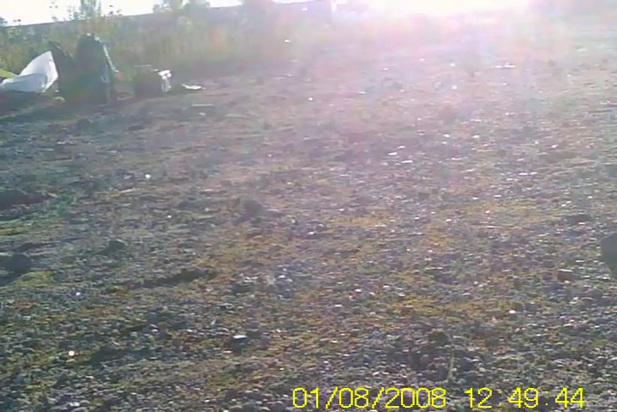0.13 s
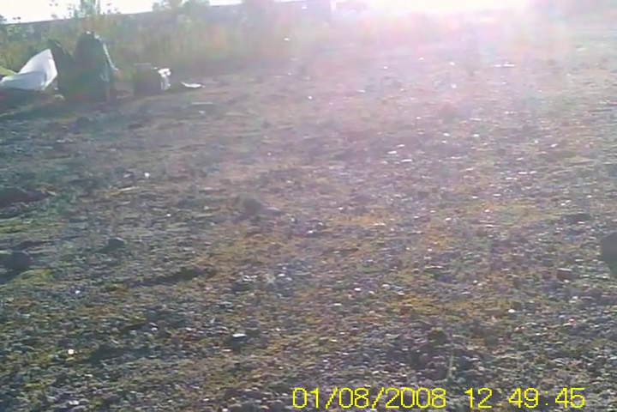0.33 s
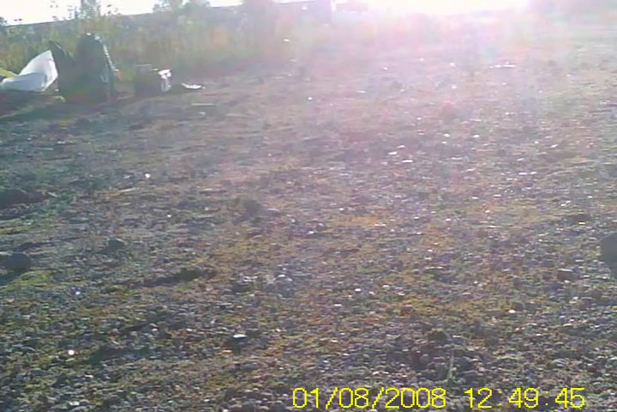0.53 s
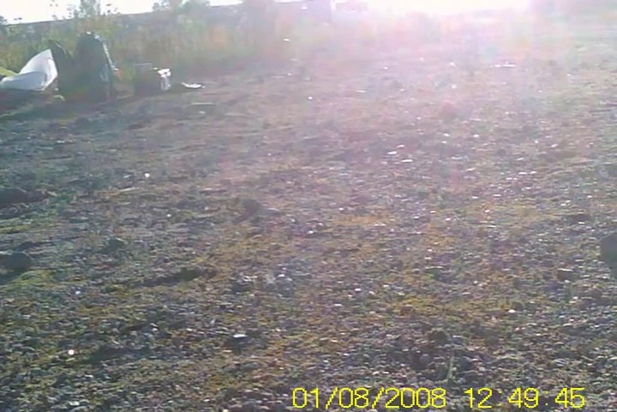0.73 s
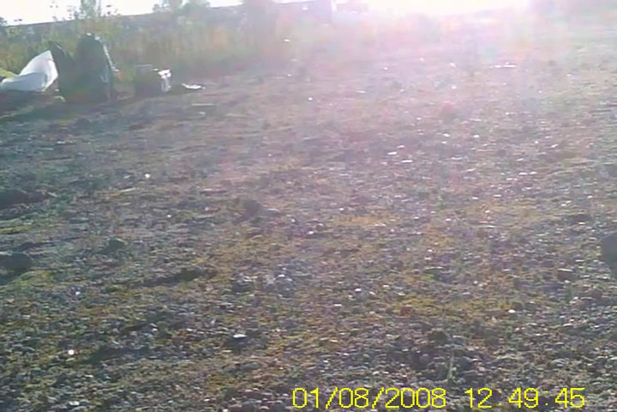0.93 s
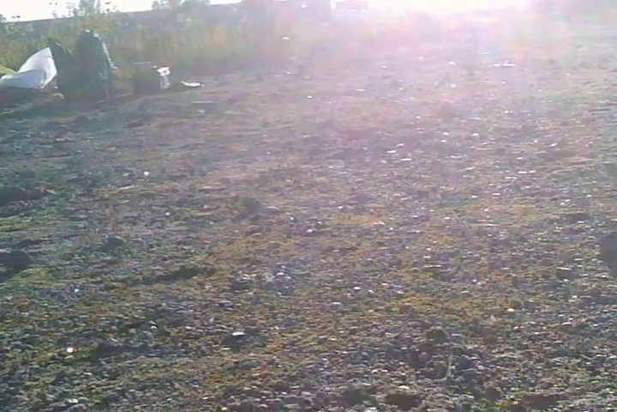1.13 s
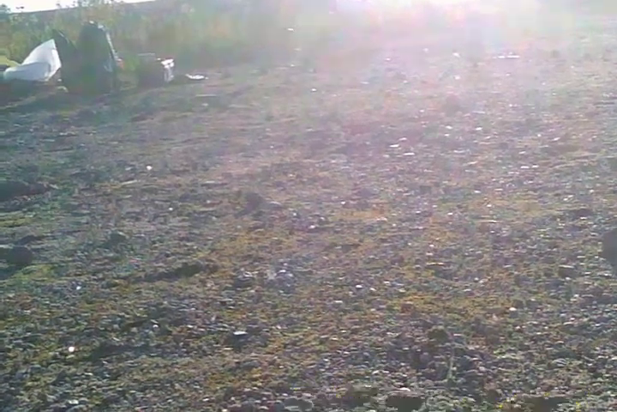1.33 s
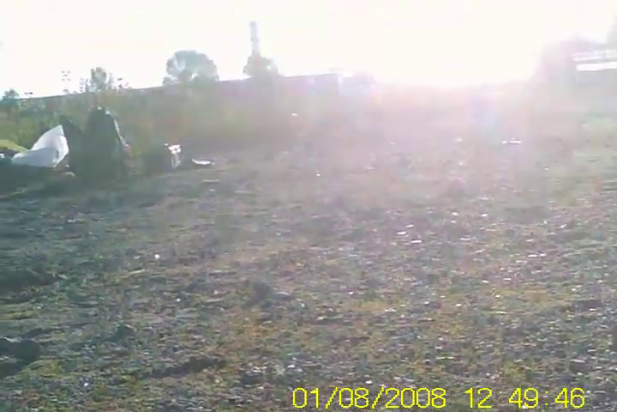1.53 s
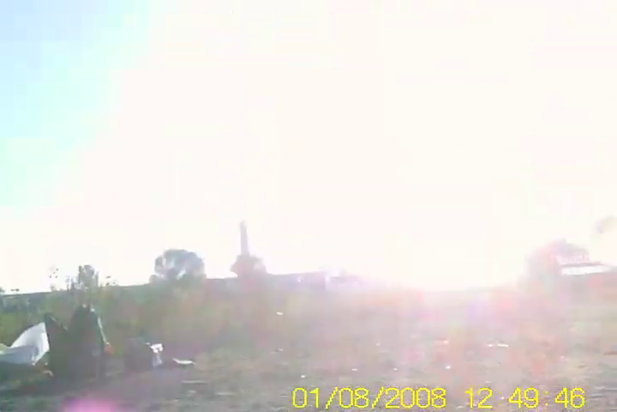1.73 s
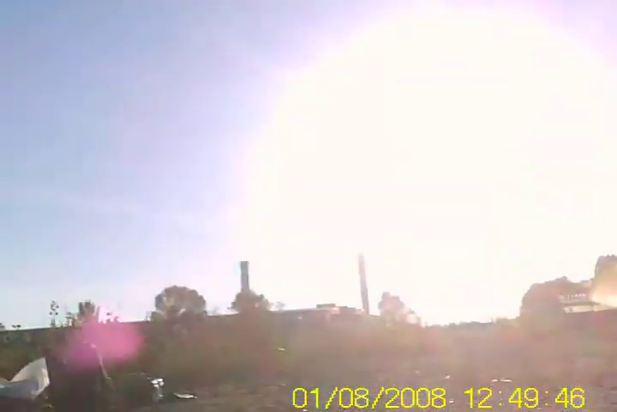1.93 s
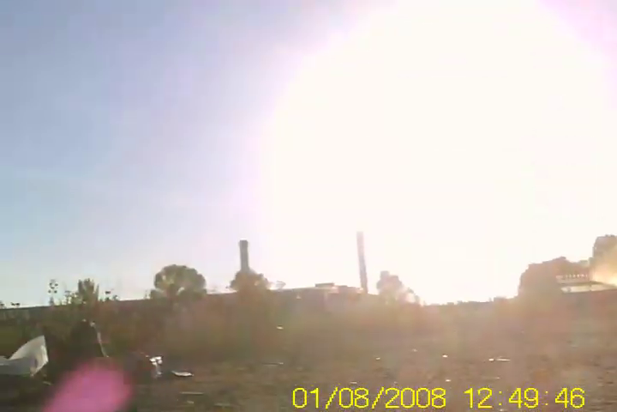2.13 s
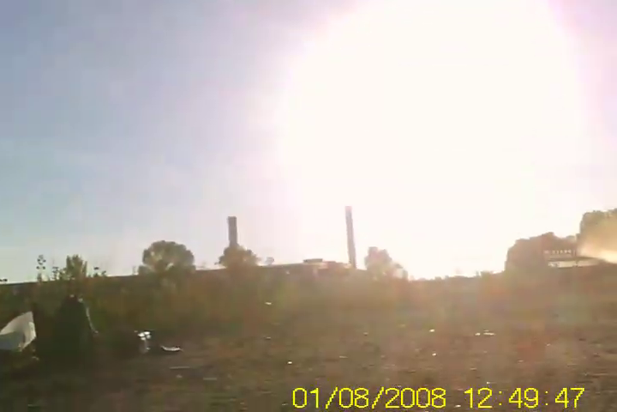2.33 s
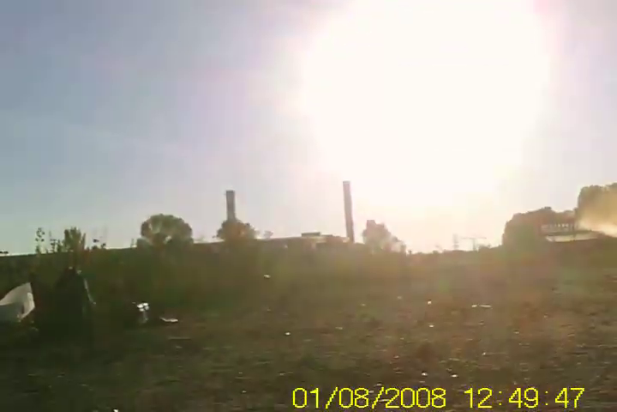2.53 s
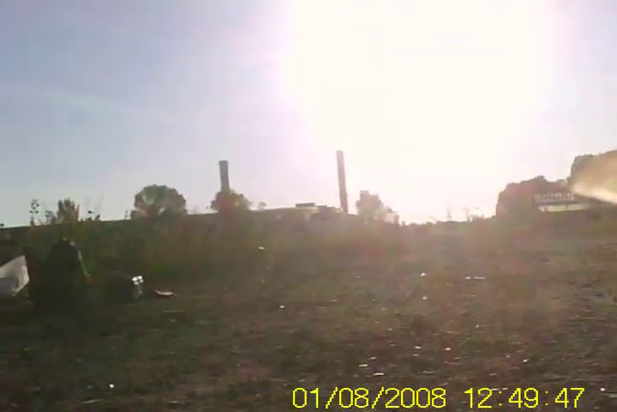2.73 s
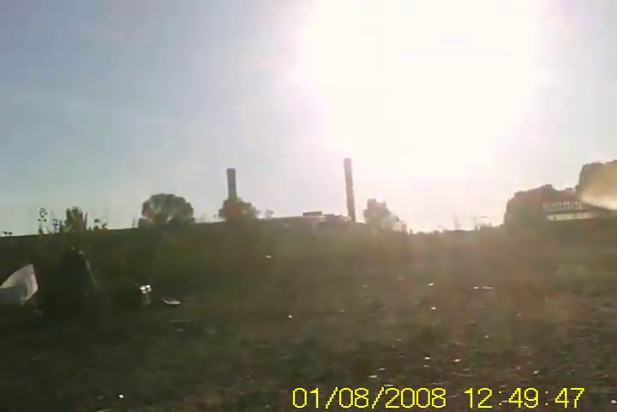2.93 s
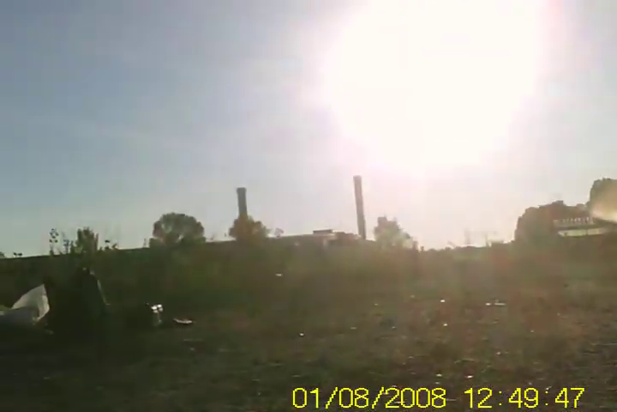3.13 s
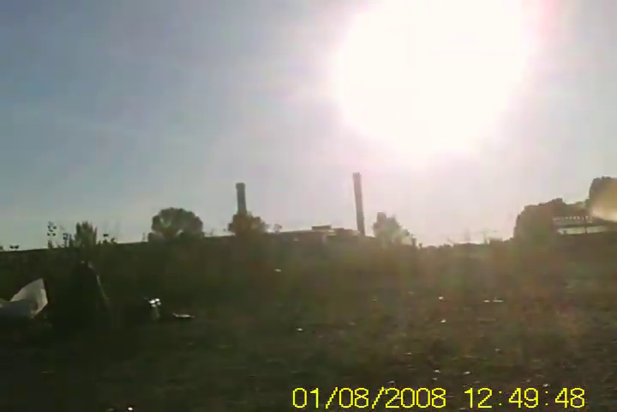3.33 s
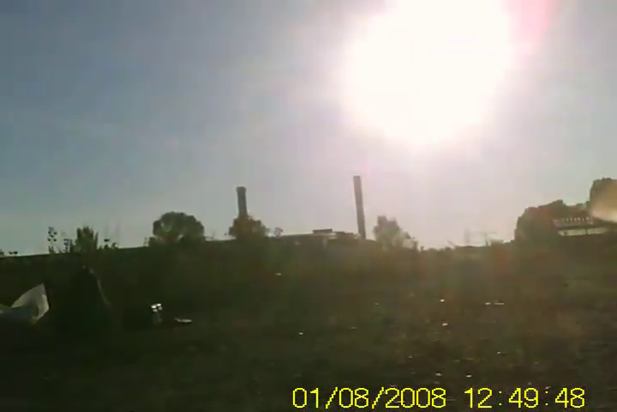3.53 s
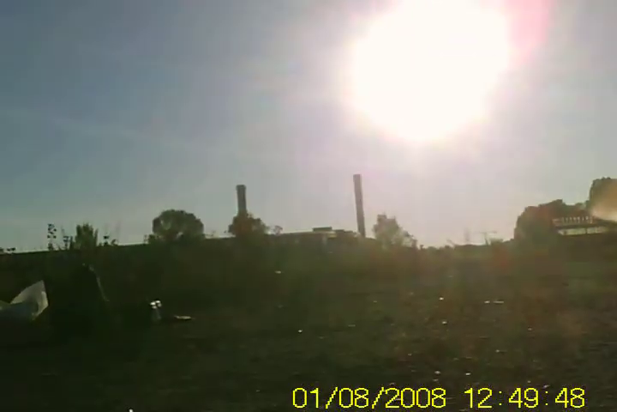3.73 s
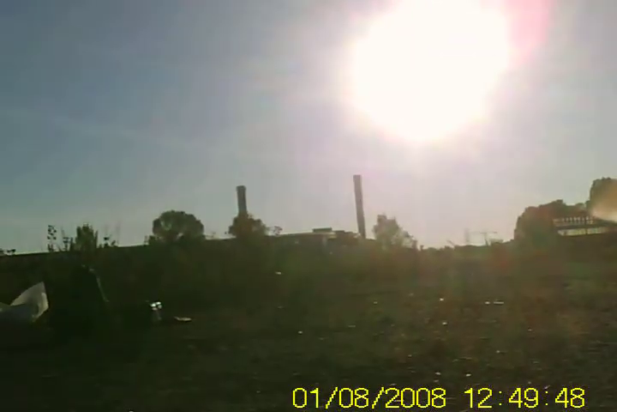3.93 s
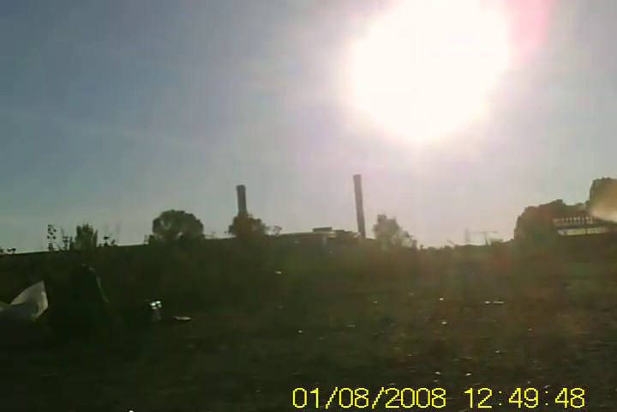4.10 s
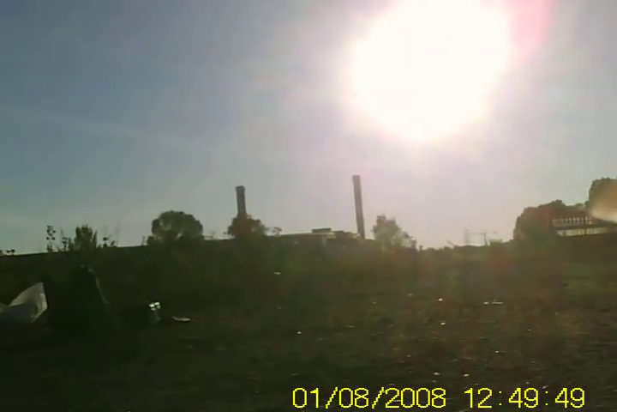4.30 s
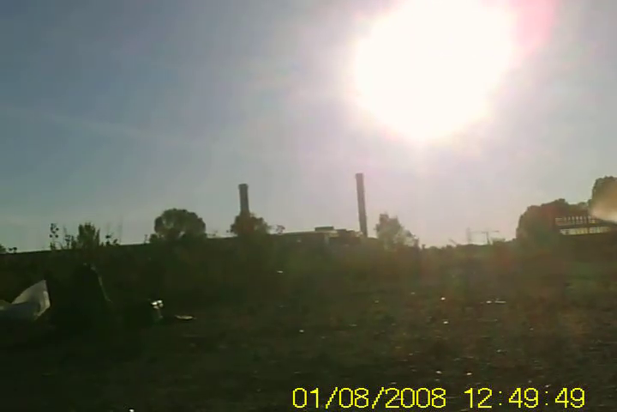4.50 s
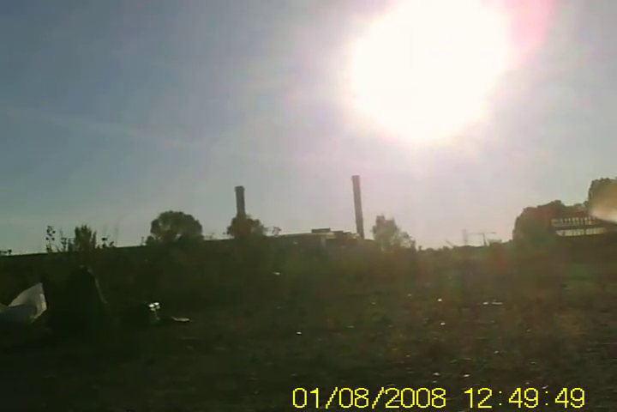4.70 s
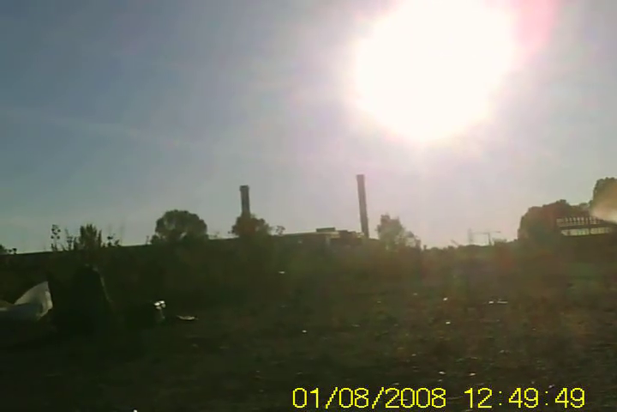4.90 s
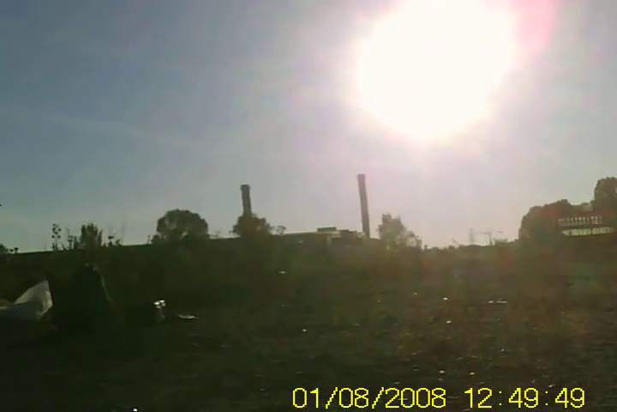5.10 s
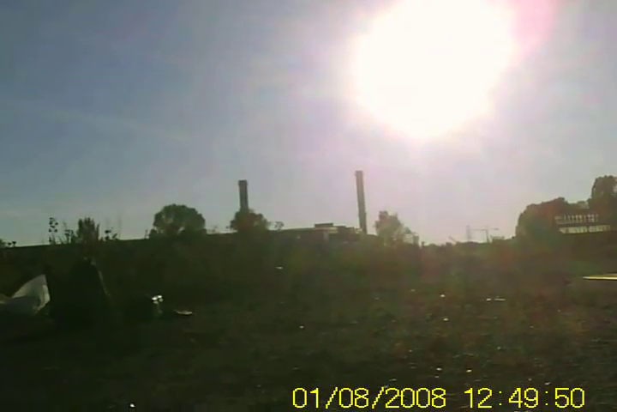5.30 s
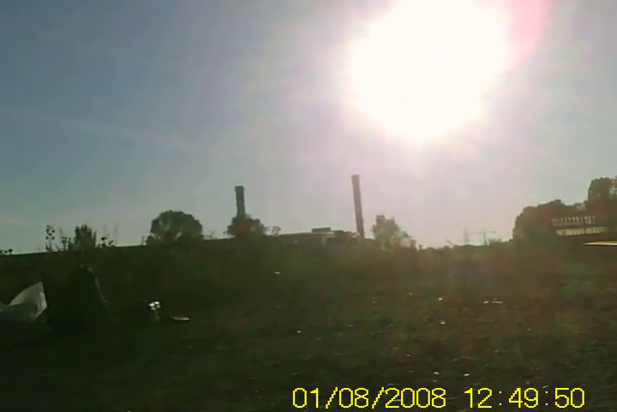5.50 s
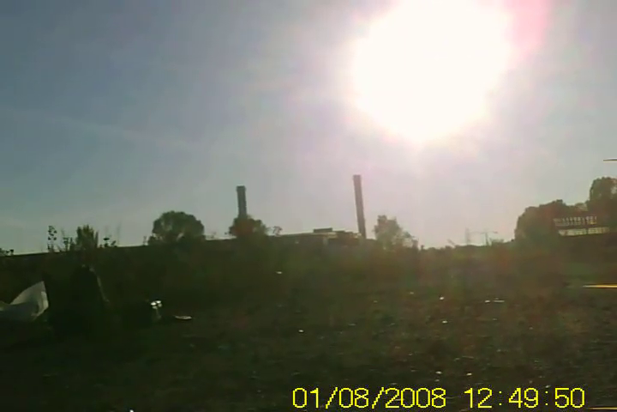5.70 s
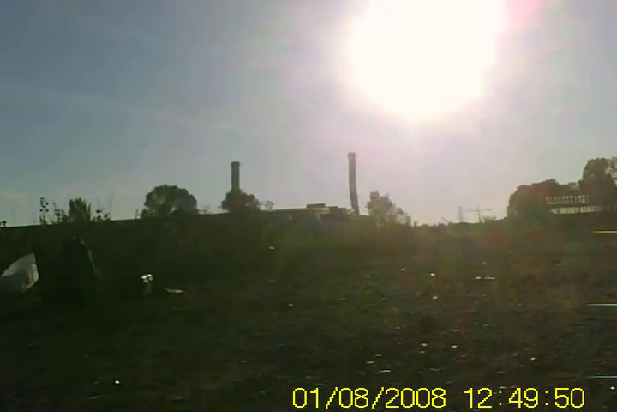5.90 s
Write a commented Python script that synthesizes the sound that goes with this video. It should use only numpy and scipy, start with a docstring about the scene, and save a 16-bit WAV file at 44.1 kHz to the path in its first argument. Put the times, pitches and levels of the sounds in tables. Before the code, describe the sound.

Hands tap and brush a model plane outdoors amid steady buzzy ticks; after five seconds its electric motor jerks alive and revs loudly.

```python
"""The brushless motor of a model plane stutters into life after five seconds and whines up: sine lines locked
to the shaft, a switching whistle and a rattling mount; propeller wash buffets and overloads the microphone.
Before that, hands knock, creak, brush and squeak on the airframe: contact pulses through resonances, and
shaped noise. Radio packets tick in the microphone line over airy noise, and a far engine drones as a
wavering, climbing sine."""
import sys
import numpy as np
from scipy import signal
from scipy.fft import rfft, irfft
from scipy.io import wavfile
from scipy.ndimage import uniform_filter1d

SR = 44100
rng = np.random.default_rng(int(sys.argv[2]) if len(sys.argv) > 2 else 0)


def int16_out(signal):
    """Quantize to a 16-bit WAV file."""
    q = np.round(np.clip(np.atleast_2d(signal).T, -1, 1) * 32767)
    wavfile.write(sys.argv[1], SR, q.astype(np.int16))


N = 262395
TIME = np.arange(N) / SR


def amp(db):
    """Decibels to gain."""
    return 10 ** (np.asarray(db) / 20)


def unit(x):
    """Scale to rms 1."""
    return x / np.sqrt(np.mean(x ** 2) + 1e-20)


def curves(rows):
    """Each column of a table, joined by straight lines in time."""
    s, *columns = np.transpose(rows)
    return [np.interp(TIME, s, column) for column in columns]


def gain_at(points, hz):
    """Gain of a spectrum at the given frequencies, drawn in dB over log frequency."""
    f, db = np.transpose(points)
    return amp(np.interp(np.log(np.maximum(hz, 1)), np.log(f), db))


def noise(points):
    """White noise shaped to the given spectrum, rms 1."""
    size = 2 ** 19
    spectrum = rfft(rng.standard_normal(size))
    shaped = irfft(spectrum * gain_at(points, np.fft.rfftfreq(size, 1 / SR)))
    return unit(shaped[:N])


def drift(rate):
    """Random wander of rms 1 with a new target rate times a second."""
    knots = rng.standard_normal(8192)
    return unit(np.interp(TIME * rate, np.arange(len(knots)), knots))


def swell(s, rise_s, fall_s):
    """Exponential rise to 1 at time s, then an exponential fall."""
    return np.exp(-np.minimum(np.maximum((s - TIME) / rise_s, (TIME - s) / fall_s), 20))


def tone(phase):
    """A sine of rms 1 with a random starting phase."""
    return np.sqrt(2) * np.sin(phase + rng.uniform(0, 2 * np.pi))


def grains(per_s, spread_db, size=N):
    """Random contacts of either sign and uneven strength."""
    hits = rng.random(size) < per_s / SR
    signs = rng.choice([-1, 1], size)
    return hits * signs * amp(spread_db * np.minimum(rng.exponential(1, size), 3))


def resonate(x, hz, width):
    """One resonance with gain 1 at its peak; a narrower width rings longer."""
    r = np.exp(-np.pi * width / SR)
    zeros = np.array([1, 0, -1]) * (1 - r * r) / 2
    poles = [1, -2 * r * np.cos(2 * np.pi * hz / SR), r * r]
    return signal.lfilter(zeros, poles, x + 1e-18)


def body(x, modes):
    """Resonances side by side, signs alternating."""
    return sum((-1) ** k * amp(db) * resonate(x, hz, width) for k, (hz, width, db) in enumerate(modes))


def lowpass(x, hz, order=2):
    """Butterworth low-pass."""
    return signal.sosfilt(signal.butter(order, min(hz, .45 * SR), fs=SR, output="sos"), x)


def add(out, s, sound):
    """Mix a sound in at time s."""
    i = int(s * SR)
    out[i:i + len(sound)] += sound[:N - i]


# spectrum of open air and microphone hiss: [f/Hz, relative level per Hz/dB]
AIR_SPECTRUM = [(12, -3.5), (28, -1), (60, -1), (100, -7.5), (150, -14), (300, -21.5), (600, -28.5),
                (1200, -27.5), (2400, -35.5), (4500, -43.5), (6300, -42), (7500, -44.5), (10000, -46.5),
                (12500, -68)]
# the far engine comes and goes: [t/s, level/dB]
ENGINE_LEVEL = [(0, -39), (.95, -50), (1.13, -37), (1.4, -51), (2.4, -39.5), (2.8, -51), (3.5, -40),
                (4, -45), (4.2, -80)]
# the engine's starting pitch [Hz] and its steady climb [Hz per s]
ENGINE_HZ, ENGINE_CLIMB_HZ_PER_S = 65.8, 10.3


def outdoors(air_db=-38.5, waver_db=1.4):
    """Rumble and hiss as shaped noise; the far engine's drone is one wavering sine that climbs steadily."""
    engine_hz = ENGINE_HZ + ENGINE_CLIMB_HZ_PER_S * TIME
    air = amp(air_db) * noise(AIR_SPECTRUM)
    engine_gain = amp(curves(ENGINE_LEVEL)[0] + waver_db * drift(9))
    return air + engine_gain * tone(2 * np.pi * np.cumsum(engine_hz) / SR)


def shell(x, hz, width_hz=480, mount_db=-7, thud_db=-11, thud_hz=330, soft_hz=2300):
    """A soft touch rings the spot touched, the main mode of the airframe and its hollow hull."""
    spot = resonate(x, hz, width_hz)
    main_mode = amp(mount_db) * resonate(x, 1790, 200)
    hull_thud = amp(thud_db) * resonate(x, thud_hz, 520)
    return lowpass(spot + main_mode + hull_thud, soft_hz, order=3)


# fingers knock on the airframe: [t/s, peak level/dB, ring f/Hz]
FINGER_KNOCKS = [(.587, -19.5, 600), (.616, -14.5, 1950), (.662, -19.5, 1850), (.775, -23.5, 1580),
                 (.888, -25, 776), (.9066, -14.5, 744), (1.352, -25, 490), (1.871, -23, 930),
                 (2.119, -21.5, 1137), (2.711, -24, 553), (2.916, -27.5, 948), (3.028, -29, 320),
                 (3.189, -25.5, 1873), (3.632, -17.5, 1145), (3.697, -20, 700), (3.7035, -14.5, 950),
                 (3.812, -23, 1710), (4.152, -24, 1780), (4.168, -20.5, 1740), (4.232, -26, 1100),
                 (4.538, -21, 1730), (4.748, -23.5, 450), (4.879, -26, 1650)]
# the grip shifts and creaks: [start t/s, length/s, rms level/dB, centre f/Hz]
GRIP_CREAKS = [(.575, .125, -37.5, 1710), (.705, .18, -44.5, 1300), (.872, .098, -39.5, 850),
               (.99, .08, -43, 1070), (3.463, .076, -45, 590), (3.628, .11, -34, 720),
               (3.786, .09, -38.5, 1671), (4.089, .052, -44.5, 688), (4.14, .053, -36.5, 1690),
               (4.52, .04, -42, 700), (4.727, .1, -41.5, 1330)]


def handling(stray_db=-61, settling_db=-56, settling_s=.45):
    """Knocks are single contacts, creaks are runs of tiny slips; both ring the shell over faint stray ticks."""
    out, tap = np.zeros(N), signal.unit_impulse(2048)
    for s, db, hz in FINGER_KNOCKS:
        scrape = .035 * rng.standard_normal(len(tap)) * np.exp(-TIME[:len(tap)] / .006)
        knock = shell(tap + scrape, hz, width_hz=300, thud_db=-20.5)
        add(out, s, amp(db) * knock / np.abs(knock).max())
    for s, length, db, hz in GRIP_CREAKS:
        size = int(length * SR)
        slips = grains(600, 4.5, size=size) * signal.windows.tukey(size, .4)
        creak = unit(shell(slips, hz, width_hz=670, mount_db=-34, thud_db=-3))
        add(out, s, amp(db) * creak)
    # the grip is never quite still: stray ticks all along, louder around the time it settles
    restless = amp(stray_db) + amp(settling_db) * swell(settling_s, 1, .5)
    return out + restless * unit(shell(grains(60, 1.9), 1200, width_hz=1500, mount_db=-3, thud_db=1.5))


# ringing of each packet tick: [f/Hz, width/Hz, level/dB]
TICK_MODES = [(591, 57, 4), (1443, 125, 3.5), (2155, 150, 1), (2368, 91, 4.5), (2940, 230, 2),
              (3420, 185, -2), (3850, 400, -4.5)]
# radio link: packets per s, first packet [s], and a pause in the stream [s]
PACKET_RATE, FIRST_PACKET_S = 50.635, .0052
PAUSE_START_S, PAUSE_END_S = 4.2, 4.26


def radio_ticks(level_db=-31.0, lead_share=0.22, lead_s=0.00171, data_db=-24, busy_db=-7):
    """Packets leak into the line as a weak edge, then a strong one; after the pause, as a data burst and edge."""
    edges = np.zeros(N)
    for s in np.arange(FIRST_PACKET_S, TIME[-1], 1 / PACKET_RATE):
        if s < PAUSE_START_S:
            add(edges, s - lead_s, [-lead_share])
            add(edges, s, [1])
        elif s > PAUSE_END_S:
            add(edges, s - lead_s, amp(data_db) * rng.standard_normal(size=130))
            add(edges, s + rng.normal(0, .0003), [amp(busy_db)])  # timing jitters
    ticks = lowpass(body(edges, TICK_MODES), 4000, order=8)
    return amp(level_db) * ticks / np.abs(ticks[:SR]).max()  # level_db sets the peak of the first second


# swishes: brushing over the camera case; the rows at 4.313 and 4.358 are the hiss of the two squeaks:
# [peak t/s, swell/s, level/dB]
SWISHES = [(.66, .09, -59), (1.21, .035, -48), (1.285, .007, -34), (1.32, .045, -39.5), (1.415, .025, -49),
           (1.356, .007, -25), (1.378, .009, -21), (1.61, .05, -56.5), (1.766, .016, -44), (2.99, .02, -52),
           (3.021, .009, -41), (3.69, .07, -57.5), (3.82, .025, -55), (4.161, .012, -47),
           (4.313, .012, -40.5), (4.358, .016, -43), (4.79, .06, -52.5)]
# grit snaps against the case: [t/s, level/dB]
GRIT_SNAPS = [(.997, -44), (1.049, -39), (1.278, -27.5), (1.439, -44), (3.0275, -25), (3.0298, -20.5)]
# spectrum of swishes and snaps: [f/Hz, relative level per Hz/dB]
SWISH_SPECTRUM = [(200, -2.5), (400, -10.5), (900, -25), (1450, -11), (2100, -10.5), (2600, -20.5),
                  (3400, -2), (4400, -12), (5600, -6), (6300, 2.5), (7200, -7.5), (8600, -2), (10000, -5.5),
                  (12500, -26.5)]
# a swish dies away in this share of its swell time; a snap swells and dies this fast [s]
SWISH_FALL_SHARE, SNAP_S = .7, .0008


def brushing(flutter_db=3.9):
    """Gritty swishes, sharp snaps and the hiss of the squeaks: fluttering shaped noise under fast swells."""
    level = sum(amp(db) * swell(s, rise, rise * SWISH_FALL_SHARE) for s, rise, db in SWISHES)
    level = level + sum(amp(db) * swell(s, SNAP_S, SNAP_S) for s, db in GRIT_SNAPS)
    return level * noise(SWISH_SPECTRUM) * amp(flutter_db * drift(500))


# a finger squeaks on the skin: [start t/s, length/s, starting slip rate f/Hz, level before fades/dB]
FINGER_SQUEAKS = [(4.3, .037, 1350, -35), (4.34, .04, 1220, -37)]
# the slips slow down as the finger stops [octaves per s]
SQUEAK_SAG_OCT_PER_S = 12


def squeaking(jitter=.07, edge_share=.45):
    """Stick-slip pulses that slow down and ring the skin of the airframe."""
    out = np.zeros(N)
    skin_modes = [(2270, 590, 0), (3760, 440, 1), (6280, 230, 3.5), (8600, 350, -9)]  # f/Hz, width/Hz, level/dB
    for s, length, slip_hz, db in FINGER_SQUEAKS:
        size = int(length * SR)
        slowing = 2 ** (-SQUEAK_SAG_OCT_PER_S * TIME[:size])
        rate = slip_hz * slowing * (1 + jitter * drift(1100)[:size])
        slips = np.diff(np.floor(np.cumsum(rate) / SR), prepend=0)  # one pulse per completed cycle
        squeak = unit(body(slips, skin_modes))
        add(out, s, amp(db) * squeak * signal.windows.tukey(size, edge_share))
    return out


# the rotor judders before it finds its step: centre and half width [s]
JUDDER_S, JUDDER_WIDTH_S = 5.098, .023


def juddering():
    """Bell-shaped spell in which the rotor is out of step."""
    return np.exp(-np.minimum(((TIME - JUDDER_S) / JUDDER_WIDTH_S) ** 2, 20))


# the rotor jerks as it catches: [t/s, level/dB]
ROTOR_JERKS = [(5.0372, -13), (5.0701, 7.5), (5.091, 0), (5.099, -3), (5.1185, 8), (5.1295, 0), (5.145, -3),
               (5.164, -7), (5.184, 1.5), (5.22, -15)]
# ringing of the motor mount: [f/Hz, width/Hz, level/dB]
MOUNT_MODES = [(331, 73, -5.5), (467.6, 30, 1.5), (678, 62, 1), (1017, 120, -3.5), (1306, 108, -3.5),
               (1857, 110, 3.5), (2047, 148, 1.5), (2260, 114, -3), (2830, 380, -13.5), (3780, 430, -16.5),
               (6000, 850, -27), (8850, 1150, -26)]
# low ringing of the hull: [f/Hz, width/Hz, level/dB]
HULL_MODES = [(130, 110, -5.5), (252, 57, 1), (347, 40, -7), (467, 32, 3.5), (620, 38, 0), (1013, 77, -7),
              (1280, 64, -3.5)]
# the controller switches on, and the rotor catches a moment later [s]
POWER_ON_S, CATCH_S = 5.037, 5.07


def start_up(judder_db=-10, sizzle_db=-32, strain_db=-29, strain_s=.05):
    """The rotor catches in jerks that ring the mount; the hull judders and the treble sizzles."""
    kicks = np.zeros(N)
    for s, db in ROTOR_JERKS:
        add(kicks, s, amp([db]))
    mount_peak = np.abs(body(signal.unit_impulse(512), MOUNT_MODES)).max()
    jerks = lowpass(body(kicks, MOUNT_MODES), 4500) / mount_peak
    # the two strongest jerks overload the microphone with a sharp broadband click
    overload_click = resonate(kicks * (kicks > 2), 9000, 4900)
    sizzle_noise = resonate(resonate(rng.standard_normal(N), 8400, 600), 8400, 600)
    sizzle = amp(sizzle_db) * unit(sizzle_noise)
    hull = unit(body(grains(700, 1.9), HULL_MODES))
    # the stalled rotor already strains against the hull as the power comes on
    strain = amp(strain_db) * hull * swell(POWER_ON_S, 1, strain_s) * (TIME > POWER_ON_S)
    judder = (amp(judder_db) * hull + sizzle) * juddering() * (TIME > CATCH_S)
    return jerks + overload_click + strain + judder


def fade_above(speed, limit, steepness):
    """Gain 1 at low speed, one half at the limit, falling away beyond it."""
    return 1 / (1 + (speed / limit) ** steepness)


# lines around the controller's switching tone: [offset/shaft multiples, level/dB]
SIDEBANDS = [(-14, -16), (14, 0.5), (28, -16), (42, -25), (56, -28)]
# switching tone [Hz], whistle reference level [dB]
SWITCH_HZ, WHISTLE_DB = 7993, -40
# shaft speed at full throttle, and where the bare tone has halved [turns per s]
FULL_SPEED, CARRIER_FADE_SPEED = 96, 45


def whistle(speed, angle):
    """The switching tone peaks at half throttle; commutation chops it into side lines that fan out with speed."""
    switching = 2 * np.pi * SWITCH_HZ * TIME
    carrier = fade_above(speed, CARRIER_FADE_SPEED, 4.5) * tone(switching)
    sides = sum(amp(db + 2.2 * drift(70)) * tone(switching + k * angle) for k, db in SIDEBANDS)
    throttle = np.clip(speed / FULL_SPEED, .09, 1)
    return amp(WHISTLE_DB) * np.sin(np.pi * throttle) * (carrier + sides) * (TIME > POWER_ON_S)


# rattle level before its fade [dB]; speed at which rattle and whine have faded by half [turns per s]
RATTLE_DB, SMOOTH_SPEED = -22.7, 72
# each jerk stirs up the rattle: level [dB re the jerk], decay [s]
JERK_RATTLE_DB, JERK_RATTLE_S = -23.5, .015


def rattle(speed, angle, throb=.35, top_hz=9500):
    """Play in bearings and mount: dense contacts throb twice a turn, burst at each jerk and fade at high speed."""
    level = amp(RATTLE_DB) * fade_above(speed, SMOOTH_SPEED, 7) * (TIME > CATCH_S)
    for s, db in ROTOR_JERKS:
        level = level + amp(db + JERK_RATTLE_DB) * (TIME > s) * swell(s, 1, JERK_RATTLE_S)
    contacts = grains(4000, 3.5) * (1 + throb * np.sin(2 * angle))
    return level * unit(lowpass(body(contacts, MOUNT_MODES), top_hz, order=4))


# shaft speed at which the by-speed gains hold [turns per s]
CRUISE_SPEED = 40


def by_speed(speed, db, rise_db):
    """Gain that changes by rise_db each time the shaft speed doubles."""
    return amp(db + rise_db * np.log2(speed / CRUISE_SPEED))


# motor force lines; 12 slots and 14 poles cog 84 times a turn: [multiple of shaft rate, level/dB]
FORCE_LINES = [(12, -44.5), (14, -32), (21, -50), (24, -44), (28, -35.5), (35, -41.5), (42, -33.5),
               (49, -34.5), (84, -31.5), (98, -45)]
# how the airframe radiates them: [f/Hz, level/dB]
AIRFRAME_RESPONSE = [(150, -8), (350, -1), (550, 3), (850, -2), (1050, 1), (1500, -2), (1680, 1),
                     (1780, 11), (2020, 12), (2130, 9), (2280, -2), (2450, -7), (2850, -3), (3350, -9),
                     (3650, -28)]
# gain at cruise speed before torque and fades [dB], change per doubling of speed [dB]
WHINE_DB, WHINE_RISE_DB = 2.0, -3.5
# torque: usual acceleration [turns per s per s], change when it doubles [dB]
USUAL_ACCELERATION, TORQUE_DB = 60, 3
# the whine sets in as the rotor locks into step [turns per s]
LOCK_SPEED = 14


def whine(speed, angle, waver_db=3.3, wobble=.15, rough=.15):
    """Magnetic force lines grow with torque and flare through resonances; the off-centre rotor roughens them."""
    acceleration = np.maximum(uniform_filter1d(np.gradient(speed) * SR, size=1500), 1)
    torque_gain = amp(TORQUE_DB * np.log2(acceleration / USUAL_ACCELERATION))
    level = by_speed(speed, WHINE_DB, WHINE_RISE_DB) * torque_gain
    locked = 1 - fade_above(speed, LOCK_SPEED, 4)
    level = level * locked * fade_above(speed, SMOOTH_SPEED, 4) * (TIME > CATCH_S)
    uneven_angle = 2 * np.pi * np.cumsum(speed * (1 + .003 * drift(300))) / SR
    lines = np.zeros(N)
    for k, db in FORCE_LINES:
        radiated = gain_at(AIRFRAME_RESPONSE, k * speed)
        lines += amp(db + waver_db * drift(60)) * radiated * tone(k * uneven_angle)
    return level * lines * (1 + wobble * np.sin(2 * angle) + rough * drift(450))


# spectra of propeller wash and of puffs of air: [f/Hz, relative level per Hz/dB]
WASH_SPECTRUM = [(10, -19), (25, 4), (60, 5), (120, -10), (250, -18.5), (500, -26), (1000, -47),
                 (3000, -68.5)]
PUFF_SPECTRUM = [(80, -11), (220, -0.5), (500, -4.5), (1200, -15), (3000, -20.5), (9000, -42.5)]
# gain at cruise speed [dB], change per doubling of speed [dB]
BLADE_DB, BLADE_RISE_DB = -23.5, 6
SHAKE_DB, SHAKE_RISE_DB = -16.5, 7.5
WASH_DB, WASH_RISE_DB = -21.5, 7.5
# the wash reaches the microphone and the airframe starts to shake: time and build-up [s]
WASH_ARRIVES_S, WASH_BUILD_S = 5.362, .008


def propeller(speed, angle, flap_db=-13, gust_db=2.5):
    """Blade thumps, gusty wash, and an unbalance that shakes the airframe and slaps a puff of air once a turn."""
    thumps = tone(2 * angle) + .25 * tone(3 * angle) + .17 * tone(4 * angle)
    blades = by_speed(speed, BLADE_DB, BLADE_RISE_DB) * thumps
    puffs = amp(flap_db) * unit(noise(PUFF_SPECTRUM) * (1 + .66 * np.sin(angle)))
    shake = by_speed(speed, SHAKE_DB, SHAKE_RISE_DB) * (tone(angle) + puffs)
    wash = by_speed(speed, WASH_DB, WASH_RISE_DB) * noise(WASH_SPECTRUM) * amp(gust_db * drift(20))
    arrived = .5 + .5 * np.tanh((TIME - WASH_ARRIVES_S) / WASH_BUILD_S)
    return blades * (TIME > CATCH_S) + arrived * (shake + wash)


# the throttle opens in two pushes: [t/s, shaft speed/turns per s]
SHAFT_SPEED = [(5.035, 2.0), (5.1, 9.0), (5.16, 13.45), (5.4, 28.06), (5.46, 31.14), (5.52, 33.73),
               (5.6, 36.5), (5.66, 41.04), (5.7, 46.42), (5.75, 54.5), (5.85, 75.84), (5.89, 83.14),
               (5.95, 89.25)]


def motor():
    """Every motor layer follows the speed and angle of the one shaft."""
    speed, = curves(SHAFT_SPEED)
    angle = 2 * np.pi * np.cumsum(speed) / SR
    return whine(speed, angle) + rattle(speed, angle) + whistle(speed, angle) + propeller(speed, angle)


def scene():
    """All sources at the one microphone."""
    background = outdoors() + radio_ticks()
    hands = handling() + brushing() + squeaking()
    return (background + hands + start_up() + motor())[None]


# the level dips briefly: [start t/s, length/s, level change/dB]
LEVEL_DIPS = [(5.7225, .011, -17), (5.868, .045, -4)]
# top of the passband [Hz]
CUTOFF_HZ = 11838


def record(dry, ceiling=0.8, gain_db=-2.5):
    """The input overloads softly into its ceiling, the level dips twice, the top is cut steeply."""
    clipped = dry / (1 + (dry / ceiling) ** 8) ** (1 / 8)
    dip_steps = sum(db * ((TIME > s) & (TIME < s + length)) for s, length, db in LEVEL_DIPS)
    dip_db = uniform_filter1d(dip_steps * 1.0, size=48)  # about 1 ms edges
    top_cut = signal.butter(20, CUTOFF_HZ, fs=SR, output="sos")
    return signal.sosfilt(top_cut, clipped * amp(gain_db + dip_db))


dry = scene()
out = record(dry)
int16_out(out)
```